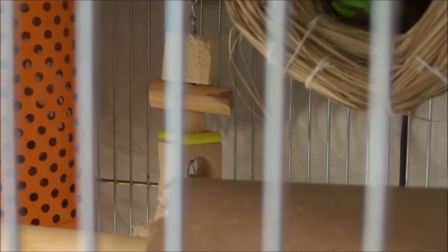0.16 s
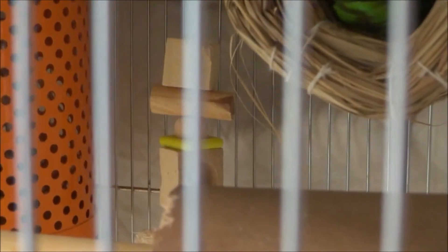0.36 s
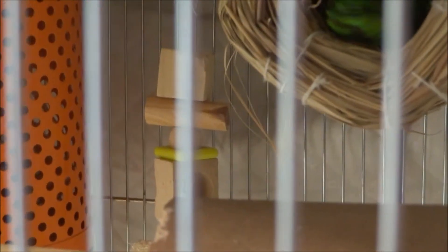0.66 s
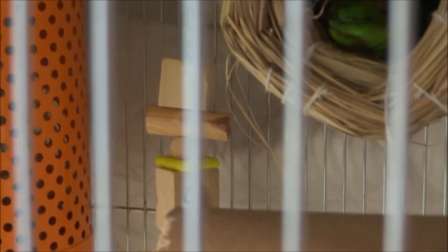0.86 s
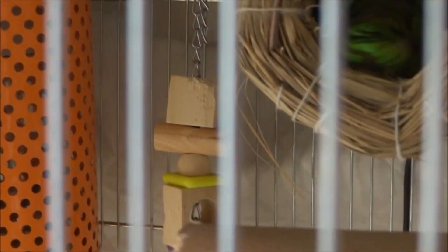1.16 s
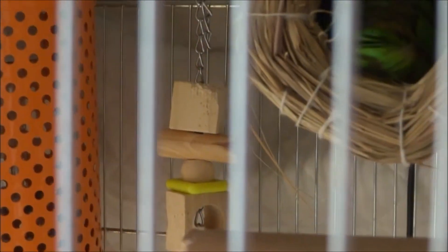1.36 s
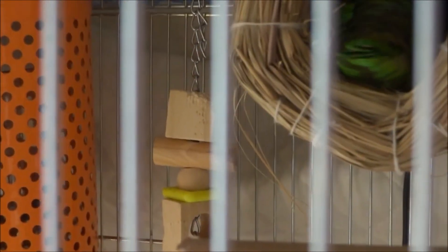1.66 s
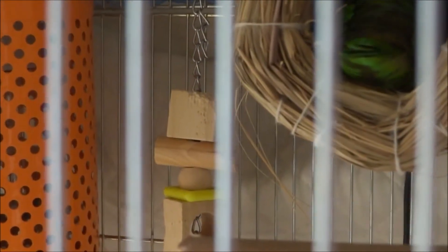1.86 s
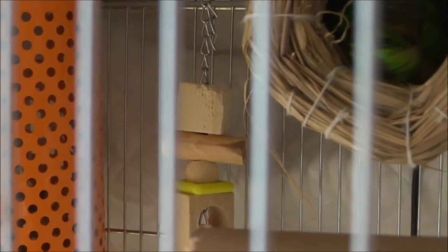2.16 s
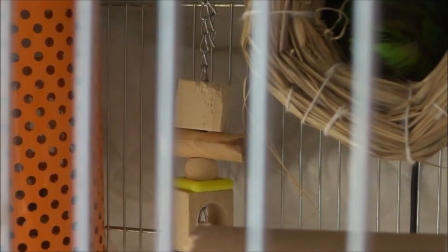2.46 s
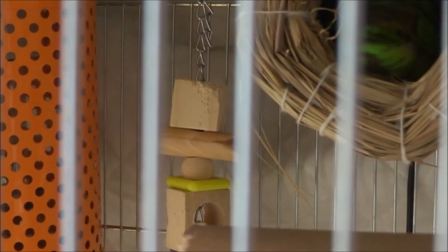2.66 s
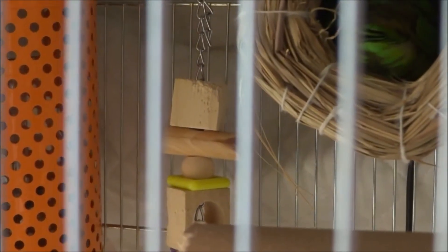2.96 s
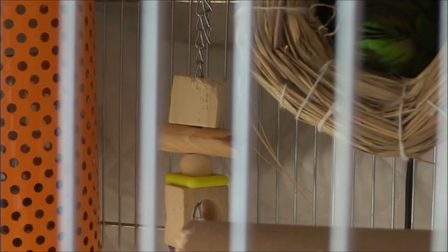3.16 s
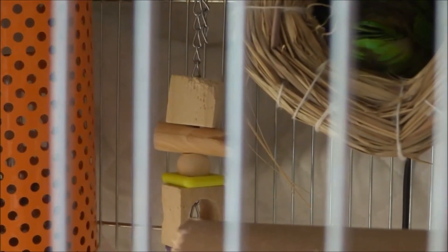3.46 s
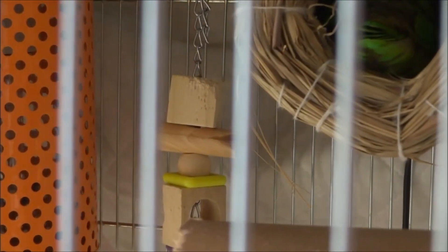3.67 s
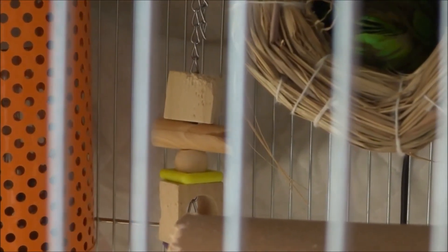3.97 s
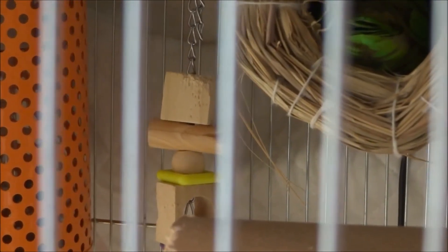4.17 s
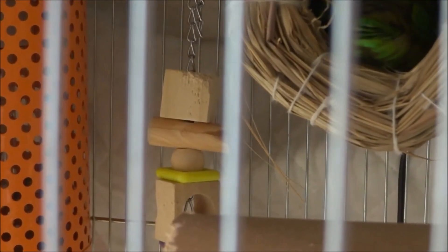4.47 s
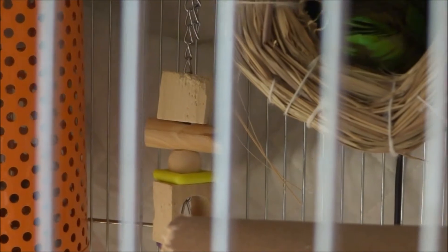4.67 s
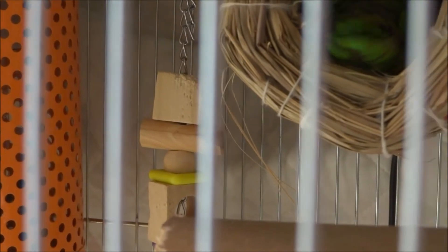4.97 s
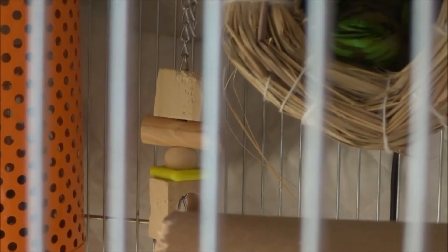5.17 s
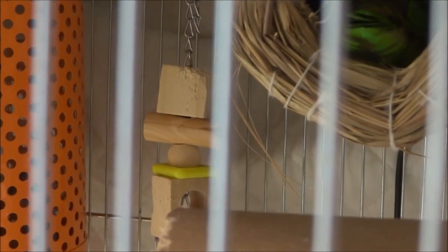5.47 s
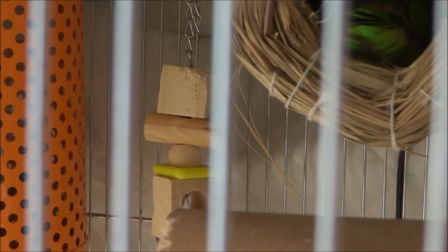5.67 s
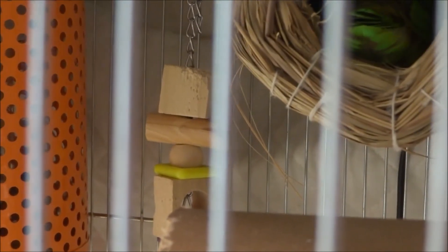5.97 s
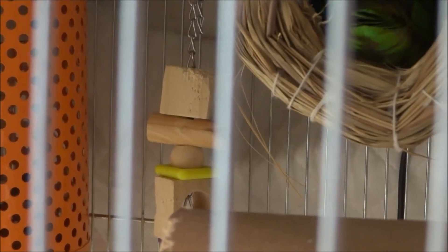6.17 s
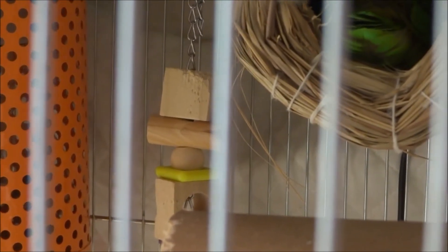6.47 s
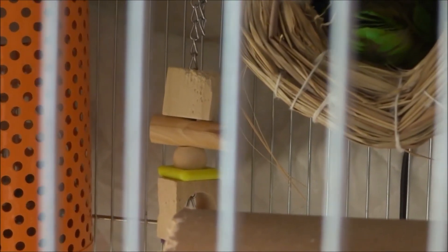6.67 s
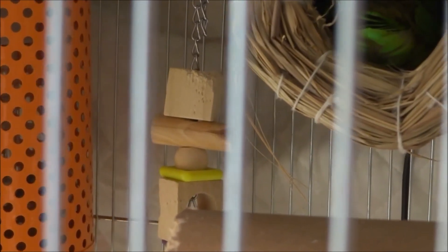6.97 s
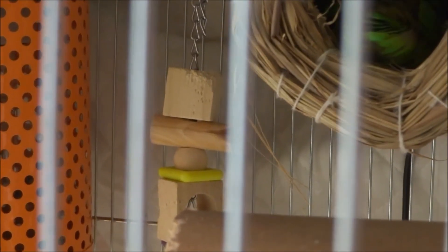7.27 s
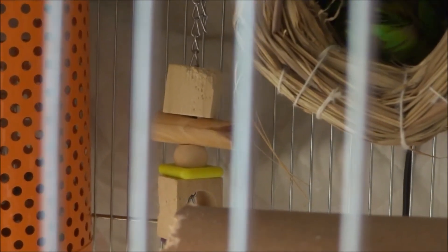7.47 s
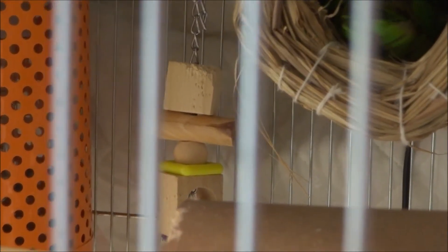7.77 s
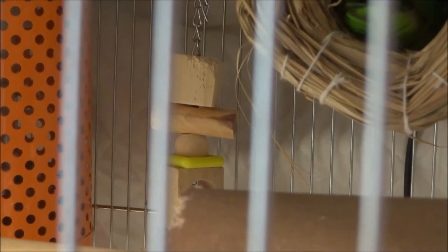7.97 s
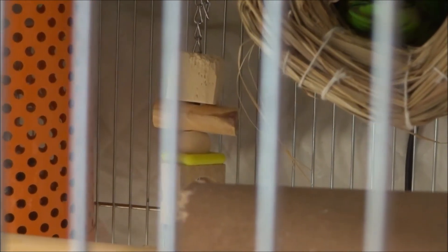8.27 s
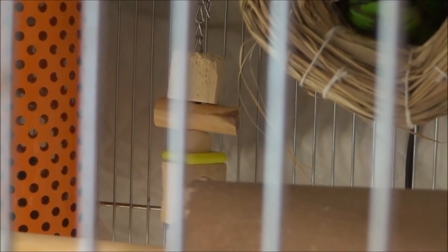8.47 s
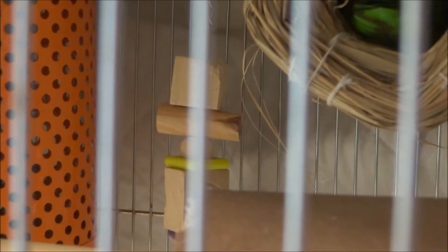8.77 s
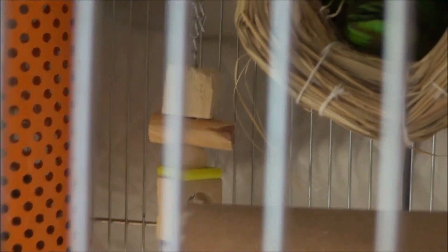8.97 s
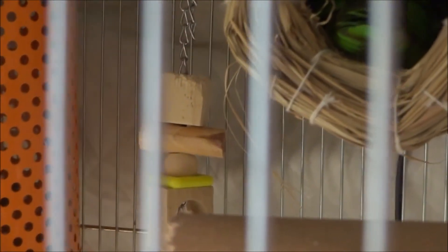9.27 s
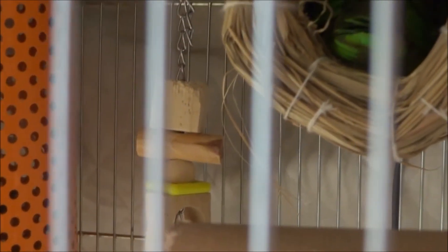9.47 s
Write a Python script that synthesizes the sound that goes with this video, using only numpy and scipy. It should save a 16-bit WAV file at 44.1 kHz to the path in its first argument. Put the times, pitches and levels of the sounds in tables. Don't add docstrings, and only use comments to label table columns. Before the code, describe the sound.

A small indoor parrot calls close to the microphone. Straw ticks come first, then one bright chirp and quick paired chirps that sink and lengthen into soft whistles. Later, loud agile warbles leap and dip in two bursts; after quiet, a rough-edged warble and a fast fluttering call climbing in pitch. Airy hiss and faint mechanical rattling continue throughout, with near cage reflections and a short room tail.

```python
import sys
import numpy as np
from scipy import signal
from scipy.fft import rfft, irfft
from scipy.io import wavfile
from scipy.ndimage import uniform_filter1d, minimum_filter1d

SR = 44100
rng = np.random.default_rng(int(sys.argv[2]) if len(sys.argv) > 2 else 0)


def output_pcm(signal):
    pcm = np.clip(np.atleast_2d(signal).T, -1, 1) * 32767
    wavfile.write(sys.argv[1], SR, np.round(pcm).astype(np.int16))


def volts_from_decibels(level):
    exponent = np.asarray(level, float) / 20
    return 10 ** exponent


N = 423801

# [f/Hz, level/dB per Hz]
HISS_MID = [(18, -61.5), (30, -32.5), (88, -24), (215, -16.5), (311, -10.5), (584, -7.5), (721, -6),
            (913, -6.5), (1280, -4), (2410, -10), (2610, -11.5), (14800, -16.5), (16000, -24.5)]
HISS_SIDE = [(18, -70), (30, -42.5), (199, -23.5), (355, -10), (684, -6), (760, -3.5), (962, -9),
             (1280, -12), (2010, -10.5), (6380, -22.5), (12600, -29), (14800, -31.5), (16000, -39)]
# [t/s, level/dB]
MOTOR_LEVEL = [(0, -48.5), (1.5, -50), (3, -46), (4.5, -49.5), (5.4, -53.5), (6.2, -45.5), (7, -47.5),
               (8, -48), (9, -48.5), (9.61, -50)]
# [t/s, peak level/dB, f/Hz, t60/s, bandwidth/Hz]
TICKS = [
    (0.168, -41, 1330, .05, 900),
    (.175, -46.5, 9000, .06, 5000),
    (0.434, -31, 2500, 0.011, 6000),
    (4.22, -45.5, 627, 0.18, 273),
    (5.699, -47.5, 190, 0.18, 120),
    (7.84, -57, 130, 0.15, 100),
    (8.096, -36.5, 2300, 0.03, 1770),
    (3.242, -41, 1500, 0.025, 1200),
]
# [f/Hz, level/dB]
THROAT = [(700, -10), (1400, -13.5), (2100, -2), (3600, -2), (4500, -5), (5100, -8), (5800, -9), (7000, -4),
          (9000, -2.5), (11000, -1), (13000, -8.5), (16000, -19.5)]
# [f/Hz, level/dB]
RASP = [(450, -46), (900, -11.5), (2000, -3), (3500, -5.5), (5000, -17), (6200, -3.5), (11000, -14),
        (13500, -9), (16000, -25)]
# [f/Hz, level/dB]
HALF_SHUT_BEAK = [(1000, 2), (2500, -0.5), (4000, -1), (5000, -24), (6300, -2), (8500, -4.5), (11000, -13),
                  (13200, 3), (16000, 0)]
# [overtone tilt/dB per octave, rasp level/dB, period doubling level/dB, unsteadiness/0-1,
#          cracked onset/s, doubling level in the crack/dB]
CLEAR = (-4.5, -36, -48, .07, 0, 0)
THIN = (-9.5, -36, -55, .1, 0, 0)
WHISTLE = (-8.5, -35, -40, .015, .004, -14)
HOARSE = (-7, -8, -4, .1, 0, 0)
CROAK = (-7, -2, -4, .35, 0, 0)
REEDY = (-10, -11, -14, .18, 0, 0)
SHARP = (-4.5, -13, -24, .17, 0, 0)
SOFT = (-8, -10, -11, .25, 0, 0)
BUZZ = (-5, -16, -17, .16, .03, -10)
CREAK = (-5, -1, 2, .35, 0, 0)
CATCH = (-7, -18, -18, .03, 0, 0)
TREMBLING = (-7, -31, -37, .24, 0, 0)
SPLIT = (-12, -37, -16, .1, 0, 0)
PIPING = (-5.5, -43, -47, .01, .003, -20)
NASAL = (-5, -29, -41, .02, .009, -13)
# [t/s, f/Hz, effort level/dB]
FIRST_CHIRP = [
    (CLEAR, [(.656, 4870, -20), (.659, 4880, -18.5), (.6615, 4790, -22)]),
    (SHARP, [(.662, 4300, -16), (.6635, 3840, -11), (.6652, 3750, -19), (.6675, 3660, -7), (.6695, 3300, -18.5)]),
    (CREAK, [(.67, 2400, -17), (.674, 2200, -18), (.679, 2080, -20), (.685, 2000, -20), (.687, 1950, -28)]),
]
# [t/s, length/s, f/Hz, effort level/dB, end f over start f]
CHIRPS = [(0.882, .001, 3780, -24, 1), (.889, 0.0051, 3700, -7, 1), (0.8943, 0.0047, 4000, -10, 1.05),
          (.899, 0.0066, 3450, -8, 0.99), (1.1006, 0.0024, 3390, -6, .95), (1.1049, .0016, 3190, -12, 1),
          (1.1064, .0016, 3300, -14, 1.04), (1.2695, 0.0036, 3200, -7, 1.12),
          (1.2733, .0012, 2750, -15, .95), (1.2753, .0028, 3290, -9, 1.03),
          (1.4828, 0.0052, 3420, -10, .92), (1.49, 0.0021, 3150, -16, 1), (1.651, 0.0063, 2720, -13, 1.25),
          (1.66, 0.0031, 2720, -15, 1.05), (1.8066, .0045, 2320, -13, 0.974),
          (1.811, 0.0044, 2560, -16.5, 0.95)]
# [t/s, f/Hz, effort level/dB]
LONG_CHIRPS = [
    (SOFT, [(2.008, 1880, -20), (2.012, 1830, -21), (2.016, 1900, -16), (2.0212, 1780, -21)]),
    (NASAL, [(2.194, 1500, -22), (2.198, 1520, -22), (2.203, 1620, -20)]),
    (NASAL, [(2.3575, 1530, -24), (2.362, 1550, -21.5), (2.37, 1585, -18.5), (2.381, 1525, -20.5), (2.389, 1610, -29)]),
    (PIPING, [(2.5395, 2016, -21.5), (2.547, 2036, -12), (2.565, 2106, -9), (2.577, 2084, -10.5), (2.607, 2068, -11), (2.6146, 2026, -19.5)]),
    (WHISTLE, [(2.746, 1860, -16.5), (2.753, 1790, -14.5), (2.76, 1870, -11), (2.77, 1892, -13.5), (2.78, 2020, -7.5), (2.792, 2081, -6.5), (2.805, 2038, -8.5), (2.817, 2005, -13), (2.8287, 1817, -20)]),
    (THIN, [(3.068, 2040, -30), (3.075, 2192, -22.5), (3.0905, 2270, -36.5)]),
]
# [t/s, f/Hz, effort
# level/dB]
WARBLES = [
    (CLEAR, [(4.306, 1910, -16.5), (4.3115, 3205, -15), (4.32, 3830, -12), (4.33, 3990, -7.5), (4.338, 3747, -9), (4.344, 3510, -9.5), (4.349, 4680, -10)]),
    (TREMBLING, [(4.35, 5250, -14.5), (4.354, 5320, -11), (4.357, 5200, -18), (4.363, 5580, -9), (4.369, 5550, -13), (4.375, 5220, -20)]),
    (THIN, [(4.377, 5000, -22), (4.382, 4850, -19), (4.387, 5010, -19), (4.391, 4450, -18), (4.395, 4300, -9.5), (4.4, 3903, -12.5), (4.404, 3310, -14)]),
    (CATCH, [(4.405, 3320, -15), (4.4135, 3285, -18.5)]),
    (HOARSE, [(4.414, 3285, -18.5), (4.421, 3090, -20), (4.427, 3450, -18)]),
    (CLEAR, [(4.428, 3580, -11), (4.432, 3700, -17), (4.44, 3754, -12), (4.451, 3570, -8.5), (4.454, 4000, -12), (4.4565, 5300, -12.5)]),
           (CLEAR, [(4.457, 5450, -11.5), (4.469, 5970, -6), (4.48, 5570, -13), (4.4815, 5000, -20)]),
    (CLEAR, [(4.482, 4400, -14), (4.4855, 4200, -6), (4.489, 2975, -9.5), (4.494, 2150, -11.5), (4.499, 1930, -10), (4.507, 2600, -13.5), (4.516, 2920, -20), (4.521, 2800, -30)]),
    (CLEAR, [(4.9815, 2660, -20), (4.985, 3400, -14.5), (4.989, 4350, -15), (4.993, 5000, -25.5)]),
    (THIN, [(4.994, 5320, -22), (5.0025, 5150, -19)]),
    (SPLIT, [(5.003, 5150, -19), (5.0095, 5200, -20)]),
    (THIN, [(5.01, 5220, -20), (5.017, 5800, -13), (5.023, 5440, -18), (5.029, 5600, -18.5), (5.038, 4600, -19)]),
    (THIN, [(5.039, 4270, -15), (5.045, 4200, -8.5), (5.05, 3846, -6), (5.054, 4290, -4.5), (5.058, 4850, -16.5)]),
    (THIN, [(5.06, 5000, -22), (5.066, 5230, -13.5), (5.072, 5150, -12.5), (5.079, 4950, -22), (5.087, 4380, -25), (5.102, 4110, -22), (5.107, 4030, -14), (5.116, 3950, -15.5), (5.125, 3980, -30)]),
           (CLEAR, [(5.1375, 3000, -20), (5.141, 3320, -14), (5.1445, 3500, -10.5), (5.146, 3400, -25)]),
    (CLEAR, [(5.1575, 4500, -10), (5.162, 3650, -6), (5.168, 3250, -4), (5.174, 3500, -5.5), (5.1775, 4150, -9), (5.179, 4500, -23), (5.183, 5300, -20), (5.186, 5320, -7), (5.188, 4600, -18.5)]),
    (CLEAR, [(5.1885, 4200, -13.5), (5.1905, 3450, -5.5), (5.1935, 2950, -15), (5.199, 2790, -17), (5.2035, 3000, -13.5), (5.206, 3650, -4.5), (5.209, 4270, -12.5)]),
    (CLEAR, [(5.21, 4306, -10.5), (5.2135, 3750, -7.5), (5.2172, 3350, -6.5), (5.2192, 2600, -13), (5.226, 2500, -13), (5.234, 2693, -14), (5.24, 3170, -14), (5.246, 3410, -8), (5.252, 3435, -13), (5.255, 3310, -26)]),
           (REEDY, [(7.1685, 2300, -21.5), (7.178, 2560, -18.5), (7.186, 2420, -19)]),
    (CROAK, [(7.187, 2444, -18.5), (7.195, 2600, -15.5), (7.2035, 2660, -19.5)]),
    (CLEAR, [(7.2054, 3100, -13.5), (7.2095, 3610, -3.5), (7.2135, 3450, -4.5), (7.2165, 2595, -18), (7.221, 2235, -11.5), (7.23, 2560, -14), (7.238, 2605, -10), (7.2425, 2750, -14)]),
    (CLEAR, [(7.243, 2910, -13.5), (7.247, 3730, -7), (7.251, 3930, -7.5), (7.256, 3550, -5.5), (7.26, 4006, -9.5), (7.2628, 3800, -9), (7.265, 4350, -9), (7.27, 4430, -15), (7.277, 4450, -24)]),
    (CLEAR, [(7.3065, 2560, -11.5), (7.311, 2105, -9.5), (7.317, 2295, -14), (7.326, 2374, -23)]),
]
# [t/s, gap effort level/dB, top effort level/dB, f/Hz]
BEATS = [(8.7695, -35, -19, 2130.0), (8.7769, -29, -18, 2250.0), (8.7841, -25, -18, 2310.0),
         (8.7902, -22, -15, 2120.0), (8.7995, -24, -15, 2140.0), (8.8045, -18, -13, 2230.0),
         (8.81, -20, -15, 2180.0), (8.8137, -20, -13, 2180.0), (8.8217, -28, -14, 2180.0),
         (8.8283, -29, -11, 2060.0), (8.8384, -16, -10, 2200.0), (8.8427, -24, -12, 2270.0),
         (8.8491, -22, -10, 2490.0), (8.8541, -14, -9, 2380.0), (8.8592, -22, -8, 2520.0),
         (8.867, -21, -8, 2550.0), (8.8733, -16, -7, 2740.0), (8.8831, -20, -8, 2770.0),
         (8.8895, -21, -12, 2880.0), (8.8927, -17, -8, 3070.0), (8.8996, -17, -13, 3080.0),
         (8.9033, -22, -13, 3040.0), (8.9107, -18, -12, 2910.0), (8.9169, -26, -10, 2990.0),
         (8.9237, -20, -12, 3060.0), (8.9289, -22, -10, 3100.0), (8.9333, -28, -8, 3260.0),
         (8.9417, -21, -7, 3210.0), (8.9468, -20, -10, 3100.0), (8.9547, -26, -13, 2910.0),
         (8.9634, -24, -8, 3170.0), (8.9721, -24, -10, 3340.0)]
# [delay/ms, level/dB]
ECHOES = [(1.1, -15.5), (2.7, -14.5), (4.6, -17), (7.9, -26), (12.4, -23), (17.5, -30)]
# [f/Hz, t60/s]
ROOM_T60 = [(1000, 0.24), (2200, .24), (3960, 0.16), (10400, 0.1)]
# [f/Hz, level/dB]
ROOM_COLOUR = [(1000, 0), (2100, 0), (3400, -2.5), (4600, 2), (9000, 0), (14000, 0)]


def evened(x):
    return x / np.sqrt(np.mean(x ** 2) + 1e-20)


def read(points, hz):
    f, value = np.transpose(points)
    return np.interp(np.log(hz + 1), np.log(f + 1), value)


def add(mix, s, sound):
    part = mix[round(s * SR):][:len(sound)]
    part += sound[:len(part)]


def coloured(spectrum, size):
    white = rfft(rng.standard_normal(size))
    return evened(irfft(white * volts_from_decibels(read(spectrum, np.fft.rfftfreq(size, 1 / SR))), size))


def drift(size, ms):
    span = max(int(ms * SR / 1000), 1)
    once = uniform_filter1d(rng.standard_normal(size), span)
    return evened(uniform_filter1d(once, span))


def hiss():
    mid_db, side_db, lean = -51, -52.5, 0.065
    mid = volts_from_decibels(mid_db) * coloured(HISS_MID, N)
    side = volts_from_decibels(side_db) * coloured(HISS_SIDE, N) + lean * mid
    return np.array([mid + side, mid - side])


def lens_motor():
    frames_per_s, frame_lag = 30, .36
    chatter_per_s, ring_t60_s = 150., 0.01
    whine_hz, whine_db = 740, -66.5
    out, t = np.zeros((2, N)), np.arange(400) / SR
    steps = ((np.arange(N * frames_per_s // SR) + frame_lag) * SR / frames_per_s).astype(int)
    mode = rng.integers(0, 8, N)
    kicks = volts_from_decibels(2.7 * np.minimum(rng.exponential(1, N), 3))
    kicks *= rng.random(N) < chatter_per_s / SR
    kicks[steps + rng.integers(0, 120, len(steps))] = volts_from_decibels(10.0 + 3.2 * rng.standard_normal(len(steps)))
    for k, hz in enumerate(np.geomspace(1170, 1480, 8)):
        ring = np.sin(2 * np.pi * hz * t) * t * volts_from_decibels(-60 * t / ring_t60_s)
        ports = [1.1, -.4 + 0.39 * (-1) ** k]
        out += np.outer(ports, signal.oaconvolve(kicks * (mode == k), ring)[:N])
    whine = volts_from_decibels(whine_db) * np.sin(2 * np.pi * np.cumsum(whine_hz + 8.82 * drift(N, 60.)) / SR)
    level_db = np.interp(np.arange(N) / SR, *np.transpose(MOTOR_LEVEL)) - 2.0
    return evened(out) * volts_from_decibels(level_db) + whine


def ticks():
    out, t = np.zeros(N), np.arange(4000) / SR
    for s, db, hz, t60, width_hz in TICKS:
        band = [(10, -70), (max(hz - width_hz, 20), -24), (hz, 0),
                (hz + width_hz, -14), (hz + 3 * width_hz, -40)]
        onset = np.minimum(t * hz / 2.7, 1)
        add(out, s, coloured(band, len(t)) * volts_from_decibels(db - 60 * t / t60) * onset)
    return out


def syllable(voice, course, shut=0):
    dip_hz, dip_width_hz, dip_db = 4900, 600, -13
    crack_rasp_db = -6
    tilt_db, rasp_db, doubling_db, unsteady, crack_s, crack_db = voice
    s, pitch_hz, db = np.transpose(course)
    t = np.arange(s[0] - .0006, s[-1] + 0.0013, 1 / SR)
    hz = uniform_filter1d(np.interp(t, s, pitch_hz), size=40, mode="nearest")
    effort_db = np.interp(t, s, db)
    level = volts_from_decibels(effort_db)
    level *= np.sin(np.pi / 2 * np.clip((t - t[0]) / 0.0008, 0, 1))
    level *= np.clip((t[-1] - t) / 0.0021, 0, 1)

    crack = uniform_filter1d(1. * (t < s[0] + crack_s), size=60) * (crack_s > 0)
    rasp_db = rasp_db + crack * max(crack_db + crack_rasp_db - rasp_db, 0)
    doubling_db = doubling_db + crack * max(crack_db - doubling_db, 0)
    tilt_db = tilt_db + 0.1406 * (effort_db - effort_db.max())
    level *= volts_from_decibels(4.6 * unsteady * drift(len(t), 1.6))
    hz *= 1 + 0.12 * unsteady * drift(len(t), .5) + shut * .06 * drift(len(t), 1.6)

    k = np.arange(1, 23)[:, None] / 2
    colour_db = read(THROAT, k * hz) + shut * read(HALF_SHUT_BEAK, k * hz)
    colour_db += 2.76 * (k > 1) * np.array([drift(len(t), 3.5) for _ in k])
    lines_db = colour_db + tilt_db * np.log2(np.maximum(k, 1)) + doubling_db * (k % 1 > 0)
    lines = volts_from_decibels(lines_db) * (k * hz < 17000)
    lines = lines * (np.tanh((dip_hz - k * hz) / dip_width_hz) + 1j * volts_from_decibels(dip_db))
    turns = np.cumsum(hz) / SR
    waves = lines * np.exp(1j * (2 * np.pi * k * turns + .4 * k + np.pi))
    tone = np.sqrt(2) * waves.real.sum(0) / np.linalg.norm(lines, axis=0)

    rasp_colour = [(f, band_db + shut * read(HALF_SHUT_BEAK, f)) for f, band_db in RASP]
    puffs = 1 + 0.17 * np.cos(2 * np.pi * turns)
    rasp = volts_from_decibels(rasp_db) * coloured(rasp_colour, len(t)) * puffs
    return t[0], level * (tone + rasp) / np.sqrt(1 + volts_from_decibels(2 * rasp_db))


def blip(start, length, pitch_hz, effort_db, glide):
    arch, peak = .96, .4
    bend = glide ** .5
    voice = SOFT if pitch_hz < 2700 else SHARP
    return voice, [(start, arch * pitch_hz / bend, effort_db - 3),
                   (start + peak * length, pitch_hz / arch, effort_db),
                   (start + length, arch * pitch_hz * bend, effort_db - 7)]


def flutter():
    start_s, end_s, edge_db = 8.7655, 8.9865, -30
    rise, fall, shoulder_db = .22, .78, -3.5
    bend = .11
    course = [(start_s, BEATS[0][3], edge_db + 4)]
    ends = [row[0] for row in BEATS[1:]] + [end_s]
    for (s, gap_db, top_db, hz), end in zip(BEATS, ends):
        course += [(s, hz * (1 - bend), gap_db),
                   (s + rise * (end - s), hz, top_db + shoulder_db),
                   ((s + end) / 2, hz * (1 + bend / 2), top_db),
                   (s + fall * (end - s), hz, top_db + shoulder_db)]
    course.append((end_s, BEATS[-1][3], edge_db))
    raised = [(s, hz, db + 1.5) for s, hz, db in course]
    return syllable(BUZZ, raised, shut=.76)


def parrot():
    out = np.zeros(N)
    chirps = FIRST_CHIRP + [blip(*row) for row in CHIRPS] + LONG_CHIRPS
    for voice, course in chirps + WARBLES:
        add(out, *syllable(voice, course))
    add(out, *flutter())
    return signal.sosfilt(signal.butter(4, 620, "high", fs=SR, output="sos"), out)


def room(x):
    tail_db, size = -15.5, SR // 2
    taps = np.zeros((2, size))
    at = np.arange(120, size - 20, 20) + rng.integers(0, 20, (2, (size - 121) // 20))
    np.put_along_axis(taps, at, rng.choice([-1., 1.], at.shape), 1)
    hz, t, bands = signal.stft(taps, SR, nperseg=128)
    decay_db = read(ROOM_COLOUR, hz)[:, None] - 60 * t / read(ROOM_T60, hz)[:, None]
    tail = signal.istft(bands * volts_from_decibels(decay_db), SR, nperseg=128)[1]
    tail = volts_from_decibels(tail_db) * (tail + 0.39 * tail[::-1]) / np.linalg.norm(tail[0])
    for k, (ms, db) in enumerate(ECHOES):
        sides = np.array([1, .8])[::(-1) ** k]
        tail[:, int(ms * SR / 1000)] += (-1) ** k * volts_from_decibels(db) * sides
    return signal.fftconvolve(x[None], tail, axes=1)[:, :N]


def scene():
    near = parrot() + ticks()
    return near * volts_from_decibels([[-.3], [.2]]) + room(near) + hiss() + lens_motor()


def low_pass(x):
    return signal.sosfilt(signal.butter(12, 16800, fs=SR, output="sos"), x)


def record(dry):
    recovery_s = 1.2
    load = signal.lfilter([1 / SR], [1, 1 / (recovery_s * SR) - 1], (dry ** 2).mean(0))
    eased = dry * volts_from_decibels(-3.0 * np.tanh(load / 0.023))
    eased = signal.sosfilt(signal.ellip(8, .3, 40, 15900, fs=SR, output="sos"), eased)
    limit = minimum_filter1d(np.minimum(.9 / (abs(eased).max(0) + 1e-9), 1), size=121)
    return low_pass(eased * uniform_filter1d(limit, size=61))


dry = scene()
out = record(dry)
output_pcm(out)
```